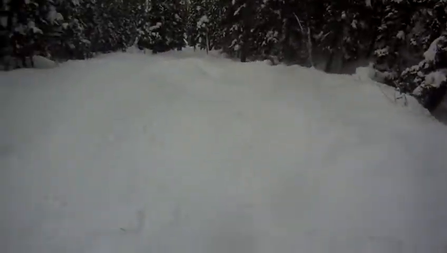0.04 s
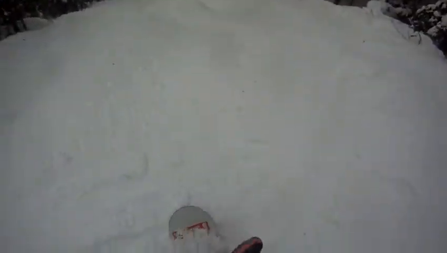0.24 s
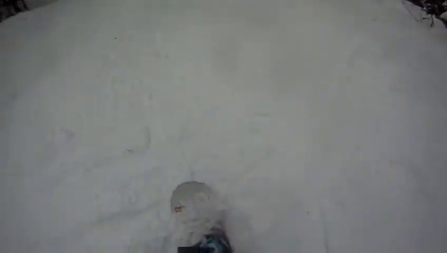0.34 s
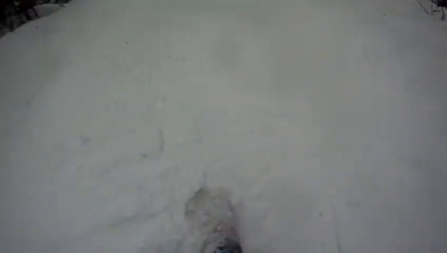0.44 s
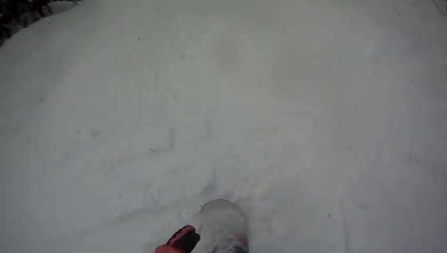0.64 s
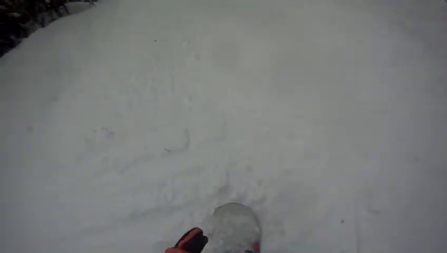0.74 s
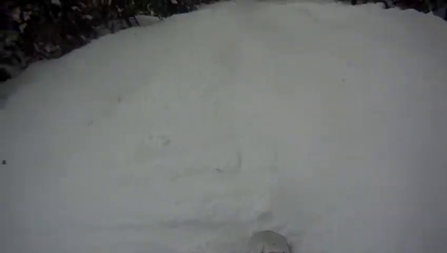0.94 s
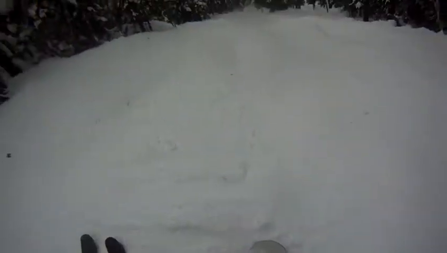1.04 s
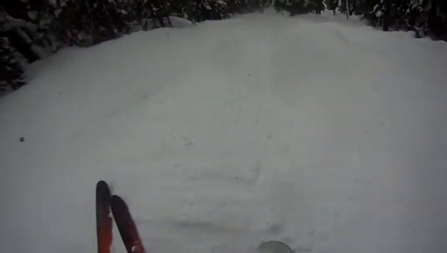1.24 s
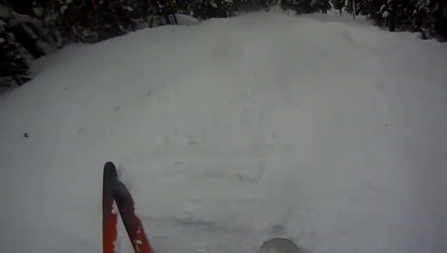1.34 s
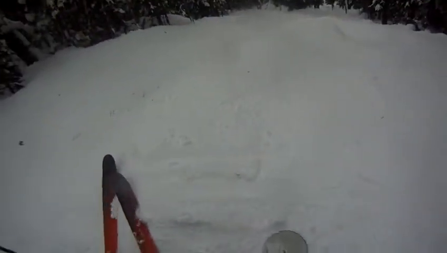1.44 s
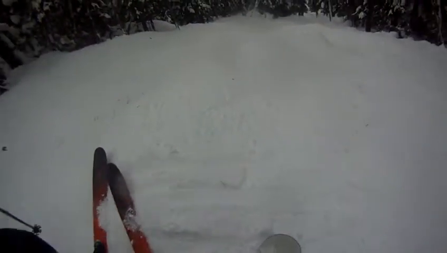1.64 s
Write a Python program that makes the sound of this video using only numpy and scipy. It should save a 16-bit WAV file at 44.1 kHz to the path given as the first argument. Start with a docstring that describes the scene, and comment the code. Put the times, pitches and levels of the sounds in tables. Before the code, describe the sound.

Skis hiss through loose snow in one short turn, then glide on quietly.

```python
"""Skis in loose snow

Out on the slope, from a body-worn camera whose microphone sits in a closed plastic case, riding
above the skis. One turn bites and sprays grains in a swelling hiss, then the bases glide on quietly.
Air rushes past, gear clicks, a ski rings faintly, snow scuffs and bumps thump through the mount.
The recorder samples coarsely and holds each sample, which adds a glassy treble."""
import sys
import numpy as np
from scipy import signal
from scipy.fft import rfft, irfft, next_fast_len
from scipy.io import wavfile

SR = 44100
rng = np.random.default_rng(int(sys.argv[2]) if len(sys.argv) > 2 else 0)


def put_to_file(sound):
    """Save the sound as 16-bit audio at rate SR, in the file named by the first command-line argument."""
    columns = np.atleast_2d(sound).T  # one column per channel
    safe = np.clip(columns, -1, 1)
    whole_steps = np.round(safe * 32767)
    wavfile.write(sys.argv[1], SR, whole_steps.astype(np.int16))


N = 74970
T = np.arange(N) / SR

# how the closed case colours snow and gear on their way to the microphone: f/Hz, gain/dB
CASE_RESPONSE = [(500, -7), (820, -8.5), (980, -1), (1120, -11), (1260, 3.5), (1420, 4), (1650, -2),
                 (1850, -2.5), (2020, 1.5), (2130, 1), (2290, 5), (2450, -3.5), (2620, -7), (2800, 0.5),
                 (3080, -10), (3450, -1), (3720, -5.5), (3980, -14), (4300, -10.5), (4600, -11.5),
                 (5100, -7.5), (5500, -20), (5900, -31)]


def from_db(db):
    """Decibels to gain."""
    return 10 ** (np.asarray(db) / 20)


def rms_one(x):
    """Scale to unit rms."""
    return x / np.sqrt(np.mean(x ** 2) + 1e-20)


def in_time(rows):
    """A control curve at every sample."""
    return np.interp(T, *np.transpose(rows))


def colour(x, *spectra):
    """Causal (minimum-phase) filter with the product of the given spectra."""
    size = 2 * next_fast_len(N)
    log_hz = np.log(np.maximum(np.arange(size // 2 + 1) * SR / size, 1))
    db = sum(np.interp(log_hz, np.log(rows[:, 0]), rows[:, 1]) for rows in map(np.array, spectra))
    cepstrum = irfft(np.log(from_db(db)))
    cepstrum[1:size // 2] *= 2
    cepstrum[size // 2 + 1:] = 0
    return irfft(rfft(x, size) * np.exp(rfft(cepstrum)))[:N]


def flutter(depth_db, rate_hz):
    """A smoothly wandering random gain; the depth is its rms in decibels."""
    pole = np.exp(-2 * np.pi * rate_hz / SR)
    drift = signal.lfilter([1], [1, -2 * pole, pole * pole], rng.standard_normal(2 * N))[N:]
    return from_db(depth_db * rms_one(drift))


def ring(force, hz, t60):
    """One damped mode: a unit impulse sets a sine of height 1 ringing."""
    decay, step = np.exp(-np.log(1000) / (t60 * SR)), 2 * np.pi * hz / SR
    return signal.lfilter([0, np.sin(step)], [1, -2 * decay * np.cos(step), decay ** 2], force + 1e-18)


def grains(per_s, spread_db, powder_db):
    """Crystals break at random, in many sizes, over the smooth hiss of powder."""
    sizes = from_db(spread_db * np.minimum(rng.exponential(1, N), 4)) * rng.choice([-1, 1], N)
    breaks = rms_one(sizes * (rng.random(N) < per_s / SR))
    return rms_one(breaks + from_db(powder_db) * rng.standard_normal(N))


def glide():
    """The flat bases rustle quietly over the snow underfoot."""
    # loudness of the glide: t/s, level/dB
    glide_levels = [(0, -52.5), (.06, -52.5), (.17, -52), (.6, -56), (.75, -57.5), (.88, -61), (.97, -55.5),
                    (1.08, -57), (1.18, -55), (1.25, -56.5), (1.37, -51), (1.46, -58), (1.55, -56.5),
                    (1.7, -59)]
    # the rustle outside the case: f/Hz, spectral level/dB
    glide_spectrum = [(300, -22), (900, -14), (1400, -1), (2200, -3), (2800, -10), (3500, -7), (5000, -7.5),
                      (6000, -8)]
    rustle = grains(per_s=700, spread_db=3, powder_db=4.5) * flutter(depth_db=1.92, rate_hz=60)
    return from_db(in_time(glide_levels)) * rms_one(colour(rustle, glide_spectrum, CASE_RESPONSE))


def rushing_air():
    """Air flutters past, right at the camera."""
    # loudness of the airflow: t/s, level/dB
    air_levels = [(0, -62), (.17, -57.5), (.23, -64), (.45, -59), (.56, -63), (.8, -62.5), (1.0, -60),
                  (1.2, -56.5), (1.36, -60.5), (1.5, -59), (1.7, -61)]
    # its dull rush: f/Hz, spectral level/dB
    air_spectrum = [(60, -3.5), (150, 0), (300, -1.5), (600, -5.5), (1100, -10), (2000, -20)]
    rush = colour(rng.standard_normal(N), air_spectrum) * flutter(depth_db=1.57, rate_hz=51)
    return from_db(in_time(air_levels)) * rms_one(rush)


def mount_shake():
    """The shaking mount carries a low rumble straight into the microphone."""
    # strength of the shaking: t/s, level/dB
    shake_levels = [(0, -51.5), (.1, -54.5), (.16, -59), (.25, -48.5), (.32, -42.5), (.44, -42),
                    (.52, -60.5), (.75, -68.5), (.88, -54.5), (1.0, -64), (1.12, -61.5), (1.5, -60),
                    (1.7, -56.5)]
    # the mount's rumble: f/Hz, spectral level/dB
    shake_spectrum = [(12, -3.5), (25, 14.5), (40, 6.5), (65, 10), (95, -2.5), (160, -14), (400, -83)]
    return from_db(in_time(shake_levels)) * rms_one(colour(rng.standard_normal(N), shake_spectrum))


def gear_clicks(chatter_s=0.00076, length_s=0.0021, low_cut_hz=860):
    """Hard parts close by touch and chatter for a few milliseconds, heard through the case."""
    # contacts: t/s, level before low cut and case/dB, brightness/(dB per octave)
    contacts = [(.009, -39.5, -2), (0.044, -39.5, 15), (0.0909, -41.5, -3), (0.1527, -31, 0),
                (0.2883, -38, 10), (0.309, -30, -9), (0.41, -32.5, -2), (.5235, -43.5, 17),
                (.610, -42.5, 0), (0.938, -46, 3), (1.0021, -41, 22), (1.259, -45.5, -1), (1.2818, -37, 8),
                (1.2841, -32.5, -4), (1.3329, -31.5, 4.5), (1.388, -40, 2), (1.4376, -46, 15),
                (1.4875, -44.5, 1), (1.5424, -46.5, -10), (1.5718, -46.5, -15), (1.665, -44.5, 4)]
    # resonances of the gear: f/Hz, relative level/dB, t60/s
    modes = [(1406, 5, 0.0066), (1760, -0.5, 0.0075), (2350, -9, 0.008), (3450, -14.5, 0.01),
             (4570, -14, 0.001)]
    out, age = np.zeros(N), np.arange(SR // 20) / SR
    for onset, db, tilt_db in contacts:
        chatter = rng.standard_normal(len(age)) * age / chatter_s * np.exp(-age / chatter_s)
        force = chatter / np.linalg.norm(chatter)
        force[0] += 1   # the first touch, with as much energy as the chatter
        click = np.zeros(len(age))
        for k, (hz, mode_db, t60) in enumerate(modes):
            octaves_up = np.log2(hz / modes[0][0])
            click += (-1) ** k * from_db(mode_db + tilt_db * octaves_up) * ring(force, hz, t60)
        click *= from_db(db) * np.sqrt(length_s * SR) / np.linalg.norm(click)   # energy of length_s at db
        start = int(onset * SR)
        out[start:start + len(age)] += click[:N - start]
    low_cut = signal.butter(2, low_cut_hz, "high", fs=SR, output="sos")
    return colour(signal.sosfilt(low_cut, out), CASE_RESPONSE)


def ski_ring_and_scuffs():
    """A ski rings faintly at the start; then snow scuffs and squeaks in quick swells."""
    # the ski's ring, then the scuffs: t/s, rise/s, level at the crest/dB, centre f/Hz, width/octaves
    swells = [(.03, 0.039, -60, 987, 0.088), (.182, 0.0019, -52, 4200, 0.38),
              (0.2883, 0.0061, -45, 340, 1.45), (0.375, .006, -47.5, 3700, 0.57),
              (.424, 0.009, -35.5, 2277, .1), (0.441, 0.016, -51.5, 3450, 0.16),
              (1.138, .008, -66, 4370, 0.41), (1.349, 0.0048, -55, 3400, 0.45),
              (1.344, 0.015, -56, 370, 1.2), (1.505, 0.01, -58.5, 3480, 0.22),
              (1.629, 0.0065, -54.5, 3680, 0.28)]
    out = np.zeros(N)
    for onset, rise, db, hz, octaves in swells:
        edges_hz = np.clip(hz * 2 ** (np.array([-.5, .5]) * octaves), 20, SR / 3)
        band = signal.butter(2, edges_hz, "band", fs=SR, output="sos")
        band_noise = signal.sosfilt(band, grains(per_s=2100, spread_db=5.5, powder_db=-1))
        age_in_rises = np.maximum(T - onset, 0) / rise
        swell = age_in_rises * np.exp(1 - age_in_rises)
        out += from_db(db) * rms_one(band_noise * swell) * np.sqrt(np.mean(swell ** 2))
    return out


def turn(treble_hz=2440, treble_db_per_db=0.089):
    """Snow shears off in clumps, louder and brighter as the edges bite."""
    # how hard the skis shear the snow: t/s, level/dB
    shear_levels = [(0, -56), (.14, -50.5), (.168, -53.5), (.19, -48.5), (.246, -40.5), (.28, -55.5),
                    (.308, -38), (.335, -46), (.40, -40), (.42, -41), (.432, -37.5), (.475, -39),
                    (.498, -35.5), (.505, -57.5), (.52, -53), (.527, -46), (.57, -45), (.615, -45),
                    (.634, -65), (.66, -48), (.685, -64), (1.7, -71)]
    # the spray outside the case: f/Hz, spectral level/dB
    spray_spectrum = [(200, -44), (700, -14), (1300, -9.5), (2100, -1.5), (2800, -7), (3500, -2.5),
                      (5000, -6), (6000, 5.5)]
    shear_db = in_time(shear_levels)
    crystals = grains(per_s=1100, spread_db=2.5, powder_db=-2)
    clumps = flutter(depth_db=1.75, rate_hz=116)
    spray = rms_one(colour(crystals * clumps, spray_spectrum, CASE_RESPONSE))
    body = signal.sosfiltfilt(signal.butter(2, treble_hz, fs=SR, output="sos"), spray)
    treble = (spray - body) * from_db(treble_db_per_db * (shear_db - shear_db.max()))
    return from_db(shear_db) * (body + treble)


def bumps(mount_hz=60, sway_hz=24.3, sway_db=-10.5, rise_s=0.0074, fall_s=0.021):
    """Each bump swings the mount for about three cycles, with a slower sway against the push."""
    # jolts through the mount: t/s, level/dB, hold/s, push +1 or pull -1
    jolts = [(0.324, -19, 0.014, 1), (0.39, -31.5, 0.013, -1), (.901, -42, 0.027, -1),
             (1.401, -38.5, 0.024, 1)]
    out = np.zeros(N)
    for onset, db, hold, direction in jolts:
        age = np.maximum(T - onset, 0)
        swell = (1 - np.exp(-age / rise_s)) * np.exp(-np.maximum(age - hold, 0) / fall_s)
        swing = np.sin(2 * np.pi * mount_hz * age)
        sway = from_db(sway_db) * np.sin(2 * np.pi * sway_hz * age)
        out += direction * from_db(db) * swell * (swing - sway)
    return out


def scene():
    """Everything at the one microphone, riding on the skier."""
    skis = turn() + glide() + ski_ring_and_scuffs()
    return (skis + gear_clicks() + bumps() + rushing_air() + mount_shake())[None]


def record(dry):
    """Each coarse sample is held, which mirrors the sound into a glassy treble; then the top is cut."""
    recorder_hz, cutoff_hz = 12000, 15300
    coarse = signal.resample_poly(dry, recorder_hz, SR, axis=1, window=("kaiser", 5))
    held = signal.resample_poly(np.repeat(coarse, 4, axis=1), SR, 4 * recorder_hz, axis=1)[:, :N]
    return signal.sosfiltfilt(signal.butter(36, cutoff_hz, fs=SR, output="sos"), held)


dry = scene()
out = record(dry)
put_to_file(out)
```